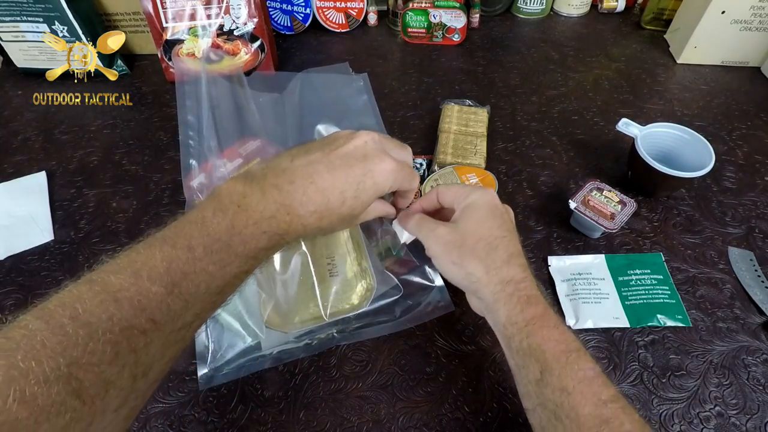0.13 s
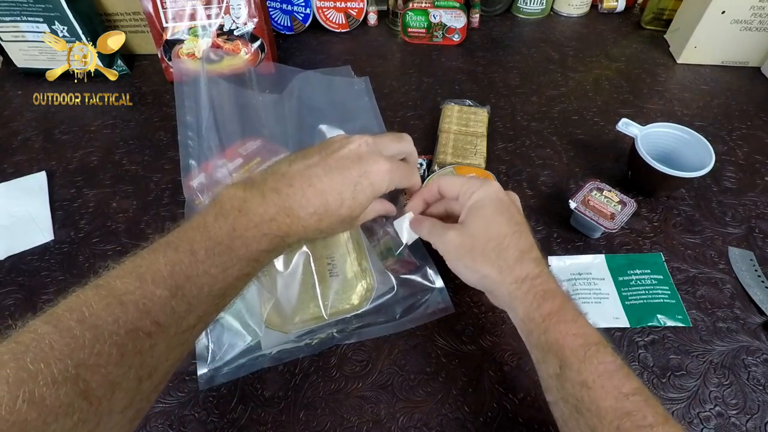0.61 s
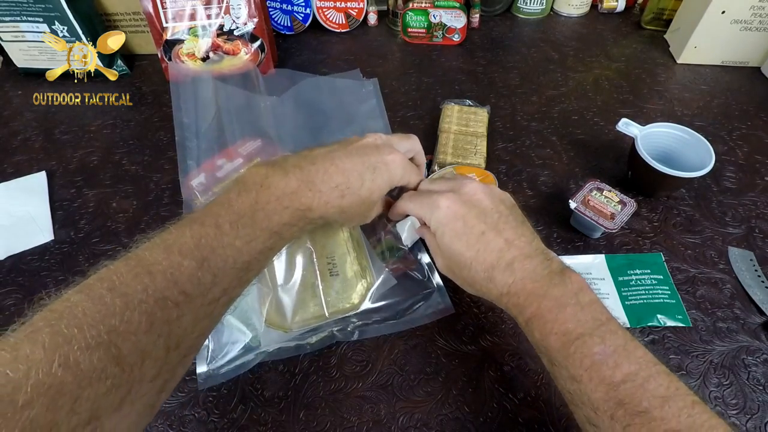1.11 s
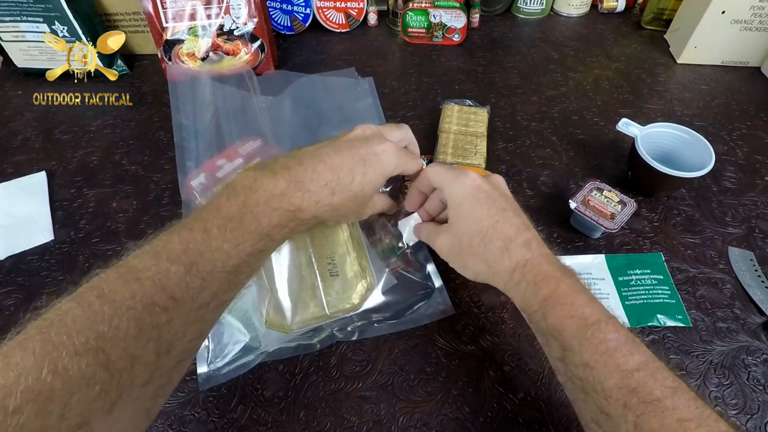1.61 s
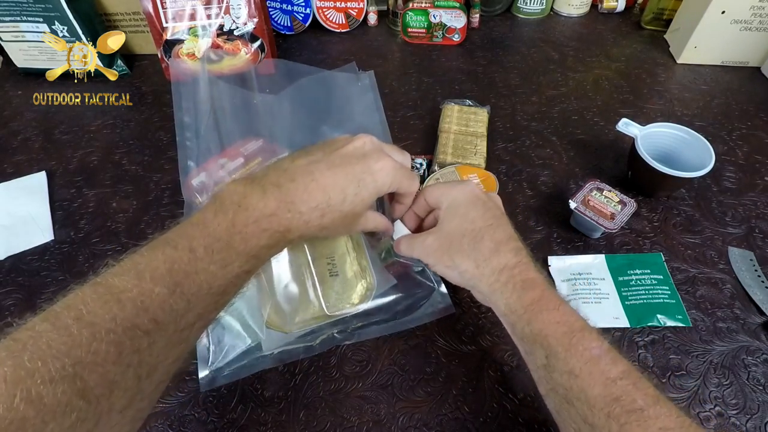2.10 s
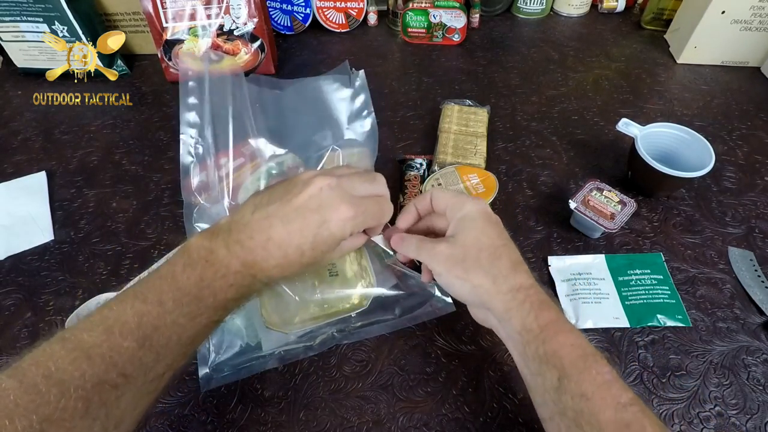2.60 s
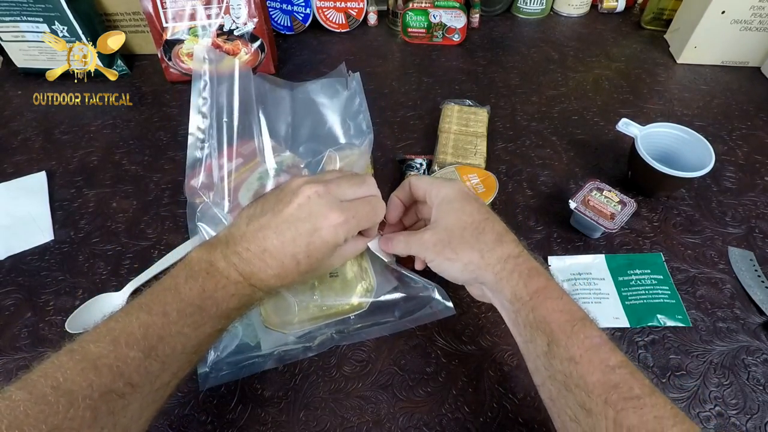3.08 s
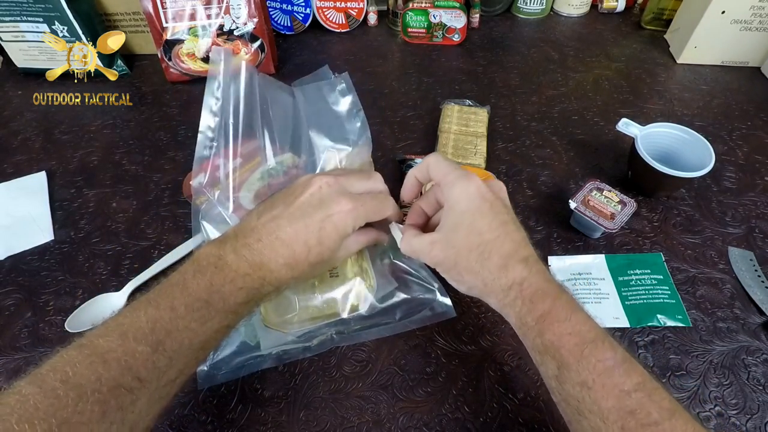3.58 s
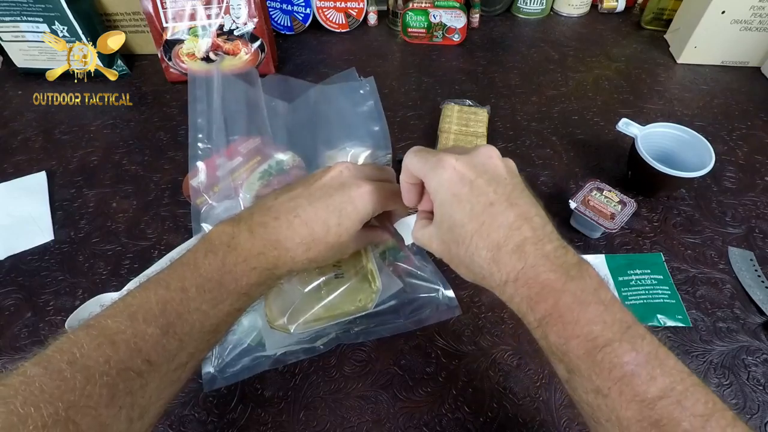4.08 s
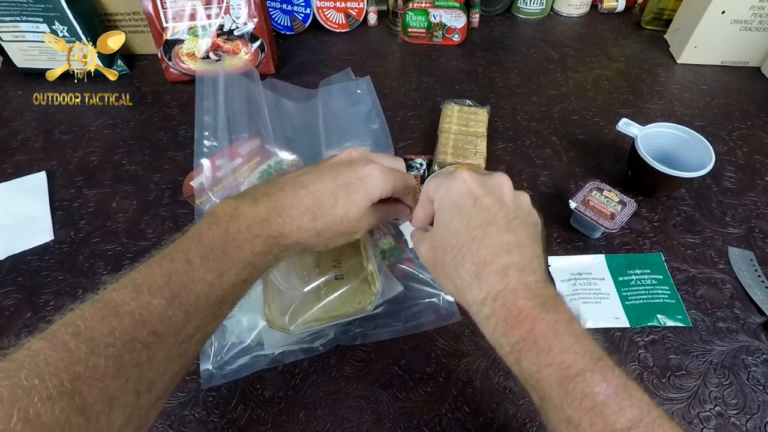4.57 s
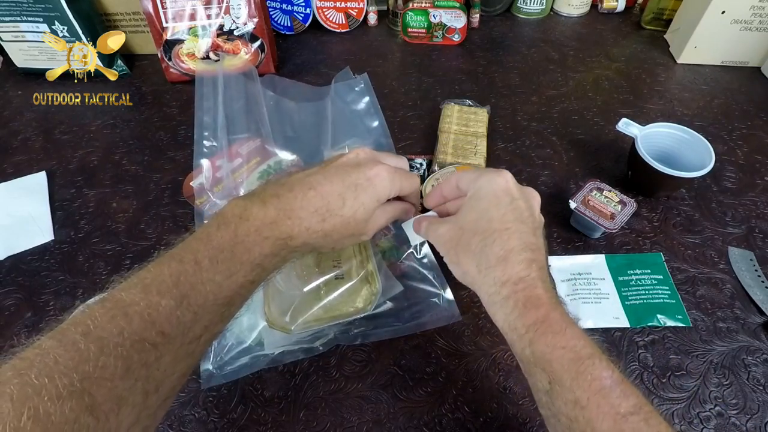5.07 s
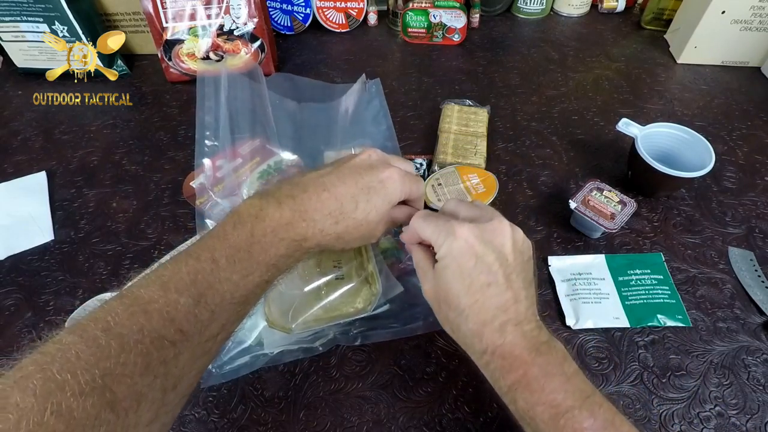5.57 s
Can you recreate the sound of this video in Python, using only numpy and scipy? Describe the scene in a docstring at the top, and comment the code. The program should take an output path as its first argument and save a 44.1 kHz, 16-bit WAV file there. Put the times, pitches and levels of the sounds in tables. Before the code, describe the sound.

A quiet small room with faint household hum and soft microphone hiss, heard close in mono. Fingers pick at a stiff plastic bag on a table. The first half second has only a few faint ticks and a breathy skin slide; at 0.6 to 0.95 s a cluster of crisp snaps comes with rustle and dull low bumps. Single clicks follow, with soft slides around 1.2 and 1.7 s. From 2.0 to 2.55 s the snaps grow louder and denser, with the firmest bump at 2.5 s. A bright snap lands at 2.86 s, then lighter clicks. Another busy run of sharp cracks and crinkles spans 3.5 to 4.35 s, strongest around 3.75 to 3.85 s. Then it thins to weak ticks and faint slides at 4.5 and 4.75 s. Around 4.9 to 5.05 s a fingertip judders in a tiny low buzz with quick clicks. A few light snaps around 5.2 to 5.3 s fade into sparse ticks.

```python
"""Creases in a stiff plastic bag snap one by one as fingers pick at its edge on a table in a small quiet room.
Each snap is a spike, a fading run of random slips and a brief ring, answered by dense echoes.
Between snaps, swarms of micro-clicks rustle, low damped cycles bump the table and smooth noise slides over
the film; once a fingertip judders in stick-slip pulses. Shaped, swaying noise is the room tone beneath."""
import sys
import numpy as np
from scipy import signal
from scipy.fft import rfft, irfft
from scipy.io import wavfile
from scipy.ndimage import uniform_filter1d

SR = 44100
rng = np.random.default_rng(int(sys.argv[2]) if len(sys.argv) > 2 else 0)


def persist_wave(psi):
    """Save psi, clipped to +-1, as 16-bit WAV."""
    counts = np.round(np.clip(psi, -1, 1) * 32767).astype(np.int16)
    wavfile.write(sys.argv[1], SR, np.atleast_2d(counts).T)


def field_ratio(decibels):
    """Amplitude ratio for a level in dB (20 dB per decade); scalars and array-likes work."""
    return 10 ** (np.asarray(decibels, dtype=float) / 20)


N = 250649  # length in samples

# Distant household hum and microphone hiss, as one spectrum.
# Each row: frequency in Hz, relative level in dB.
TONE_COLOUR = [(20, -1), (60, -7.5), (130, -11.5), (400, -12.5), (1090, -19.5), (1610, -22.5),
               (3160, -24.5), (7730, -33.5), (11000, -35.5), (15000, -28)]
# Hum bands that stand out of the hiss. Each row: centre in Hz, width in Hz, lift in dB.
HUM_BANDS = [(223.5, 22.5, 10), (553, 5.3, 8.5), (716, 13, 5.5)]
# Film flexing under the fingers.
# Each row: time in seconds, relative level of the dull rustle in dB, of the crisp rustle in dB.
FLEXING = [(0.0, -58.5, -57), (0.3, -69, -74), (0.5, -69.5, -69), (0.66, -57, -60), (1.07, -64.5, -66),
           (2.15, -65, -60.5), (2.53, -55.5, -53.5), (2.72, -60.5, -62.5), (2.88, -88, -67),
           (3.23, -68.5, -61.5), (3.53, -56, -57.5), (4.0, -59, -55), (4.24, -67, -65), (4.32, -52, -61),
           (4.62, -96, -72), (4.85, -75, -63), (5.1, -87, -80), (5.68, -76, -69)]
# Bag and knuckles bumping the table.
# Each row: time in seconds before the contact delay, level in dB, pitch in Hz.
TABLE_BUMPS = [(0.018, -47.5, 350), (0.117, -51.5, 119.2), (0.382, -49.5, 193), (0.616, -50.5, 87),
               (0.625, -39.5, 360), (0.822, -52, 72), (0.876, -44.5, 218), (.945, -47, 380),
               (1.133, -50, 250), (1.217, -48.5, 246), (1.48, -53, 264), (2.041, -46.5, 330),
               (2.201, -48, 308), (2.49, -33.5, 465), (2.564, -48, 208), (2.984, -57, 304),
               (3.313, -49.5, 230), (3.478, -49, 315), (3.532, -43, 417), (3.618, -46.5, 186.8),
               (3.728, -42, 290), (3.82, -47, 193), (3.916, -47, 326), (4.015, -49, 133), (4.28, -47, 384)]
# Creases snapping. Each row: start in seconds, ring of the film panel in Hz, relative level in dB,
# loudest pitch in Hz, drop one octave away from it in dB.
CREASES = [(0.0228, 965, -49.5, 1530, 3), (0.1777, 734, -53, 1030, 2.7), (0.3755, 1486, -52.5, 1290, 2.1),
           (0.3797, 1760, -50, 3400, 0.5), (0.6172, 2770, -37, 2500, 4.5), (0.633, 2740, -35, 2140, 6.5),
           (0.6988, 1110, -50.5, 1900, 3), (0.742, 760, -66, 900, 9), (0.7528, 2360, -44, 4330, 3),
           (0.7676, 2080, -37.5, 1860, 5), (0.8441, 1460, -40.5, 1710, 3), (0.8577, 1600, -35.5, 6400, 3.5),
           (0.876, 3560, -41.5, 3900, 2.3), (0.9081, 2150, -53, 2430, 5), (0.9392, 1430, -50, 1980, 4.7),
           (0.9504, 930, -44, 2320, 1.9), (1.1395, 900, -44.5, 1510, 1.7), (1.2239, 1470, -42.5, 2300, 5.5),
           (1.4664, 990, -54, 2300, 7), (1.4844, 1640, -39.5, 1970, 4), (1.5963, 1700, -43, 2040, 2),
           (1.6514, 1490, -44.3, 1870, 5.5), (1.7245, 1690, -51.7, 1630, 5), (1.755, 1500, -40.5, 1510, 2),
           (1.802, 810, -57, 1220, 4), (1.8187, 1568, -39.5, 1690, 5), (2.018, 1520, -56, 2000, 3),
           (2.0453, 1360, -37, 1730, 2.5), (2.0946, 1760, -33, 2740, 2.5), (2.132, 1580, -54.6, 1200, 0),
           (2.1977, 1320, -45, 760, 2), (2.2065, 1316, -29.5, 2400, 1.5), (2.2434, 1340, -42.5, 2510, 5),
           (2.3197, 1700, -55, 630, 0.8), (2.33, 1120, -38.5, 1640, 7), (2.3426, 1440, -36.5, 1390, 2.5),
           (2.3492, 1250, -42, 2220, 0.7), (2.422, 1140, -52, 1260, 7), (2.486, 2086, -38.5, 2940, 3),
           (2.4925, 1480, -33.5, 1780, 2.5), (2.51, 2310, -29.5, 3360, 3.1), (2.5646, 1920, -45, 2550, 2.5),
           (2.6102, 860, -48, 920, 4), (2.6721, 1040, -50, 1700, 4), (2.6769, 1430, -46.5, 2010, 3.2),
           (2.8574, 1300, -30.5, 3700, 2.05), (2.9306, 3584, -39.5, 5500, 6),
           (2.9844, 1045, -36.5, 3740, 1), (2.9955, 2330, -54, 2600, 5.0), (3.1122, 1120, -47.5, 1820, 3.5),
           (3.1483, 3630, -47, 2940, 5), (3.2054, 2590, -40.5, 4070, 1.5), (3.3014, 895, -53, 630, 1.7),
           (3.316, 1380, -57, 660, 1.3), (3.4649, 2060, -47.1, 1650, 2), (3.4838, 1510, -34.5, 2200, 2),
           (3.5128, 1500, -49.5, 5590, 0.7), (3.527, 1750, -52, 1360, 2.3), (3.5387, 630, -54, 2080, 1),
           (3.6229, 2130, -38.5, 1820, 2.5), (3.693, 1670, -43.5, 2240, 6),
           (3.7286, 1420, -36.5, 2200, 3.5), (3.7405, 2690, -29.5, 1950, 6.5),
           (3.7914, 2600, -48.5, 2350, 5), (3.8241, 2210, -31.5, 4080, 2.5),
           (3.8422, 1306, -41.5, 3190, 0.5), (3.9199, 1280, -46, 1310, 2), (3.924, 3690, -43, 2870, 3),
           (3.9699, 2180, -39.5, 2640, 1), (4.0099, 1390, -39, 1370, 1), (4.0748, 2590, -36.2, 3830, 2),
           (4.1751, 1770, -49.5, 1420, 1.3), (4.19, 1354, -45.5, 1320, 9), (4.2738, 3140, -44.5, 2430, 2),
           (4.2829, 1794, -39.6, 1500, 1.8), (4.294, 1794, -37.5, 1880, 5.5), (4.3215, 1496, -49, 1910, 9),
           (4.367, 1260, -48, 1580, 2), (4.4902, 1530, -64, 7000, 7), (4.4972, 786, -55, 14260, 3.7),
           (4.513, 1810, -52.5, 1180, 6), (4.5246, 1600, -57.5, 2800, 1.5), (4.5401, 4100, -49.5, 5660, 8),
           (4.5927, 1640, -50.5, 1580, 3), (4.6132, 1214, -48, 5120, 1), (4.7585, 1130, -59.5, 3920, 2.6),
           (4.7753, 3860, -49, 4370, 6), (4.813, 810, -55, 630, 1), (4.877, 3680, -41.5, 5100, 2.5),
           (4.9099, 1310, -50, 630, 0.4), (5.1741, 1443, -48.5, 1170, 4.5), (5.219, 1440, -42.5, 2410, 2.0),
           (5.251, 1420, -58, 630, 0.5), (5.2565, 1810, -39.5, 2340, 1.5), (5.3117, 876, -48.5, 2340, 5),
           (5.4059, 1334, -52, 1670, 4.5), (5.5395, 1370, -48.5, 914, 4.5), (5.6214, 1290, -62, 8000, 7),
           (5.6297, 1590, -56.5, 1350, 4)]
# Bands in which the snaps are levelled. Each row: low edge in Hz, high edge in Hz.
SNAP_BANDS = [(500, 1600), (1600, 4500), (4500, 9500), (9500, 15500)]
# Echoes off nearby things on the table, then off the walls.
# Each row: delay in seconds, 60 dB decay time in seconds, level relative to the snap in dB.
REFLECTIONS = [(.0055, 0.066, -14.5), (.01, 0.424, -26)]
# Echo trim, one value in dB for each snap band.
ECHO_TRIM_DB = [1.5, -1, 3, 1]
# Skin sliding over the film. Each row: start in seconds, length in seconds, level in dB, loudest pitch in Hz.
SKIN_SLIDES = [(0.108, 0.12, -66.5, 5200), (1.23, 0.2, -68.5, 4500), (1.705, 0.21, -66, 5500),
               (4.484, 0.097, -67, 7500), (4.737, .07, -61.5, 6500)]
# A fingertip juddering along the film. Each row: time in seconds, slip rate in Hz, relative level in dB.
FINGER_JUDDER = [(4.91, 58.4, -78), (4.94, 61.2, -60), (4.99, 66.7, -65), (5.003, 130, -56.5),
                 (5.035, 130, -65), (5.06, 130, -88.5)]
# Resonances of the microphone housing. Each row: centre in Hz, width in Hz, gain in dB.
HOUSING = [(1360, 1540, 0.5), (8000, 4200, 3), (10330, 2600, -4), (4500, 1230, -2)]

TREBLE_CUT_HZ = 15300  # the room tone, rustle, slides and echoes are cut off above this


def band(x, lo_hz, hi_hz, order=2):
    """Band-pass along the last axis."""
    edges = [lo_hz, min(hi_hz, 0.45 * SR)]
    return signal.sosfilt(signal.butter(order, edges, "bandpass", fs=SR, output="sos"), x)


def cut_treble(x):
    """Steep low-pass at TREBLE_CUT_HZ."""
    return signal.sosfilt(signal.ellip(8, 0.5, 60, TREBLE_CUT_HZ, fs=SR, output="sos"), x)


def unit(x):
    """Scale to rms 1."""
    return x / np.sqrt(np.mean(x ** 2))


def add(out, start_s, grains):
    """Lay each grain into the track at its time."""
    for s, grain in zip(start_s, grains):
        i = int(max(s, 0) * SR)
        out[i:i + len(grain)] += grain[:N - i]
    return out


def drift(rate_hz):
    """Smooth random wander: levels held for 1 / rate_hz and slewed twice, spread near 1."""
    k = int(SR / rate_hz)
    held = np.repeat(rng.standard_normal(N // k + 1), k)
    return 1.3 * uniform_filter1d(uniform_filter1d(held, k), k)[:N]


def peaks_db(f, table):
    """Sum of bell-shaped peaks (Hz, width Hz, dB) at frequencies f."""
    return sum(db / (1 + (2 * (f - hz) / width) ** 2) for hz, width, db in table)


def room_tone(level_db=-62.5, sway_db=2.86):
    """Distant household hum and microphone hiss: noise shaped in frequency, its level swaying a little."""
    hz, db = np.transpose(TONE_COLOUR)
    f = np.fft.rfftfreq(N, 1 / SR) + 1  # 1 Hz up keeps the logarithm finite
    colour_db = np.interp(np.log(f), np.log(hz), db) + peaks_db(f, HUM_BANDS)
    spectrum = rfft(rng.standard_normal(N)) * field_ratio(colour_db) * (f < TREBLE_CUT_HZ)
    return unit(irfft(spectrum, N)) * field_ratio(level_db + sway_db * drift(3.15))


def crackle(per_s, spread_db, lo_hz, hi_hz, smear_s):
    """Random micro-clicks, a few much bigger than the rest, each smeared into a short noise burst."""
    size_db = spread_db * np.minimum(rng.exponential(size=N), 4)
    click_power = (rng.random(N) < per_s / SR) * field_ratio(size_db) ** 2
    keep = np.exp(-1 / (smear_s * SR))
    envelope = np.sqrt(signal.lfilter([1], [1, -keep], click_power))
    return unit(band(envelope * rng.standard_normal(N), lo_hz, hi_hz))


def rustle():
    """Many small folds shift: big ones sound dull, fine ones crisp, and a few tick out of the swarm."""
    s, dull_db, crisp_db = np.transpose(FLEXING)
    t = np.arange(N) / SR
    dull = field_ratio(np.interp(t, s, dull_db))
    crisp = field_ratio(np.interp(t, s, crisp_db))
    folds = crackle(290, spread_db=4, lo_hz=570, hi_hz=2340, smear_s=0.0032) * field_ratio(2 * drift(12))
    fine = crackle(550, spread_db=3.5, lo_hz=2920, hi_hz=10630, smear_s=0.005) * field_ratio(-6.5)
    ticks = crackle(70, spread_db=3, lo_hz=900, hi_hz=7000, smear_s=0.0015) * field_ratio(-9)
    return cut_treble(dull * folds + crisp * fine + np.sqrt(dull * crisp) * ticks)


def bumps(cycles=1.46, push_s=0.0032, delay_s=0.00354):
    """A soft blow: a few low cycles that rise over the contact time and die away."""
    s, db, hz = np.transpose(TABLE_BUMPS)[:, :, None]
    t = np.arange(4096) / SR
    rise = 1 - np.exp(-t / push_s)
    thud = np.sin(2 * np.pi * hz * t) * rise * np.exp(-2 * t * hz / cycles)
    thud = thud / np.abs(thud).max(axis=1, keepdims=True)
    return add(np.zeros(N), s[:, 0] + delay_s, field_ratio(db) * thud)


def room(x, t60_s=0.57, db=-12):
    """Low knocks linger in the room: a decaying noise tail is added."""
    t = np.arange(SR // 2) / SR
    tail = rng.standard_normal(len(t)) * field_ratio(-60 * t / t60_s)
    tail = tail / np.sqrt(np.sum(tail ** 2))
    return x + field_ratio(db) * signal.fftconvolve(x, tail)[:N]


def creases():
    """Start, ring and level per band of all snaps: level falls as a bell over octaves from the loudest pitch."""
    # the juddering fingertip also flips 8 evenly spaced small creases, 74 a second, each 1.3 dB weaker
    k = np.arange(8)[:, None]
    first = np.array([4.9255, 1200, -59, 4000, 1])  # columns as in CREASES
    row = first + k * [1 / 74, 0, -1.3, 0, 0]
    s, ring_hz, db, loudest_hz, fall_db = np.vstack([CREASES, row]).T
    band_centre_hz = np.sqrt(np.prod(SNAP_BANDS, axis=1))[:, None]
    octaves = np.log2(band_centre_hz / loudest_hz)
    return s, ring_hz, db - fall_db * octaves ** 2


def echoes(shape, rise_s=0.00053, patchy_db=3.5, patch_s=0.0036, pocket_db=-3.5):
    """Reflections as noise that starts after a gap and dies away, arriving in uneven clumps."""
    t = np.arange(shape[1]) / SR
    level = 0
    for delay_s, t60_s, db in REFLECTIONS:
        late = np.maximum(t - delay_s, 0)
        level = level + np.minimum(late / rise_s, 1) * field_ratio(db - 60 * late / t60_s)
    k = int(patch_s * SR)
    clumps = uniform_filter1d(rng.standard_normal(shape), k, axis=1) * np.sqrt(k)
    # single reflections stand apart at first and blend later
    noise = rng.standard_normal(shape) * level * field_ratio(patchy_db * clumps * np.exp(-t / 0.016))
    # the air pocket inside the bag favours a band near its own pitch
    return cut_treble(noise + field_ratio(pocket_db) * band(noise, 960, 2750, order=1))


def snaps(soft_db=2.4, crack_t60_s=0.016, first_db=20, ring_t60_s=0.015, scatter_db=5, gain_db=2):
    """A crease flips with a spike, smaller slips run along the fold, the panel rings briefly; the room answers."""
    s, ring_hz, band_db = creases()
    t = np.arange(16384) / SR
    chance = rng.standard_normal((len(s), 2, len(t)))
    slips = chance[:, 0] * field_ratio(scatter_db * chance[:, 1] - 60 * t / crack_t60_s)
    # dull snaps are slow folds: their first spike is weaker
    dullness_db = np.clip(np.maximum(band_db[0], band_db[1]) - band_db[2], 0, 20)
    slips[:, 0] += field_ratio(first_db - soft_db * dullness_db) * np.sign(slips[:, 0])
    ring = np.sin(2 * np.pi * ring_hz[:, None] * t) * field_ratio(-60 * t / ring_t60_s)
    # every crease sits somewhere else, so each gets its own dense pattern of echoes
    answer = echoes(slips.shape)
    out = 0
    for (lo, hi), db, trim_db in zip(SNAP_BANDS, band_db, ECHO_TRIM_DB):
        crack = band(slips + ring, lo, hi, order=3)
        # rms 1 over the first 3 ms
        crack = crack / np.sqrt(np.mean(crack[:, :140] ** 2, axis=1, keepdims=True))
        # the square root makes up for the noise power lost outside the band
        tail = band(answer, lo, hi, order=3) * np.sqrt(SR / 2 / (hi - lo)) * field_ratio(trim_db)
        out = out + (crack + tail) * field_ratio(db + gain_db)[:, None]
    return add(np.zeros(N), s, out)


def slides(edge_s=0.018, width_octaves=1.3):
    """Skin friction on the film: broad smooth hiss that fades in, holds and fades out."""
    t, out = np.arange(N) / SR, 0
    reach = 2 ** (width_octaves / 2)
    for s, length, db, hz in SKIN_SLIDES:
        fade = np.clip(np.minimum(t - s, s + length - t) / edge_s, 0, 1)
        hiss = unit(band(rng.standard_normal(N), hz / reach, hz * reach, order=1))
        out = out + fade * field_ratio(db) * hiss
    return cut_treble(out)


def judder(body_hz=137, body_t60_s=0.1, scuff_db=-1):
    """Stick-slip pulses knock a low table mode while the skin scuffs the film."""
    s, rate_hz, db = np.transpose(FINGER_JUDDER)
    t = np.arange(N) / SR
    gain = field_ratio(np.interp(t, s, db)) * (t > s[0]) * (t < s[-1])
    # one pulse each time the running slip count passes a whole number
    slip_count = np.cumsum(np.interp(t, s, rate_hz)) / SR
    pulses = np.diff(np.floor(slip_count), prepend=0)
    tail = t[:4096]
    knock = np.sin(2 * np.pi * body_hz * tail) * field_ratio(-60 * tail / body_t60_s)
    scuff = unit(band(rng.standard_normal(N), 174, 1070)) * field_ratio(scuff_db)
    return signal.fftconvolve(pulses * gain, knock)[:N] + scuff * gain


def scene():
    """The bag on its table, over the room tone, as one channel."""
    knocks = room(bumps() + judder())
    return (room_tone() + rustle() + knocks + snaps() + slides())[None]


def top_cut(x):
    """Nothing passes above the cut-off."""
    return signal.sosfilt(signal.butter(12, 16540, fs=SR, output="sos"), x)


def record(dry):
    """A small microphone: housing resonances and a steep top cut."""
    f = np.fft.rfftfreq(N, 1 / SR)
    housed = irfft(rfft(dry) * field_ratio(peaks_db(f, HOUSING)), N)
    mix = signal.sosfilt(signal.butter(6, 14320, fs=SR, output="sos"), housed)
    return top_cut(mix)


dry = scene()
out = record(dry)
persist_wave(out)
```